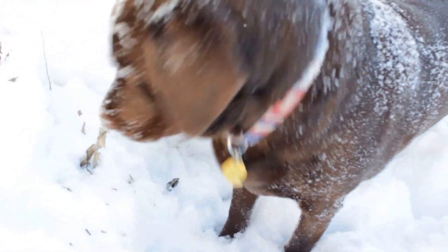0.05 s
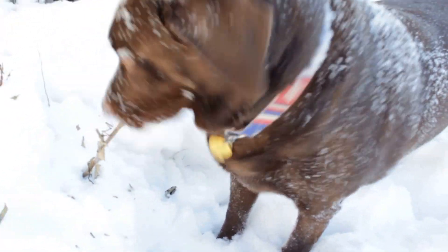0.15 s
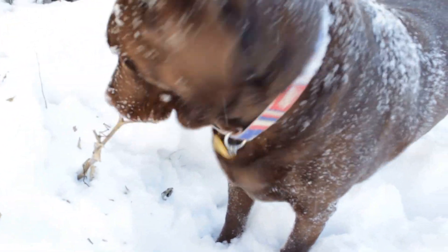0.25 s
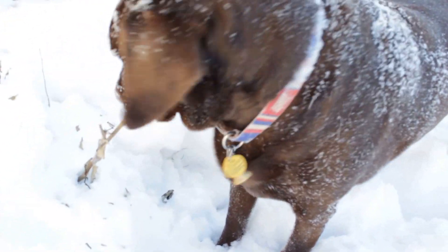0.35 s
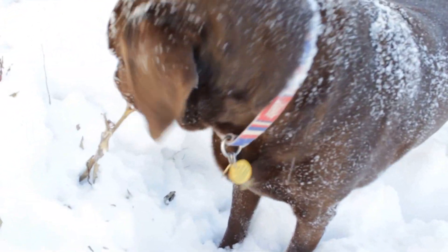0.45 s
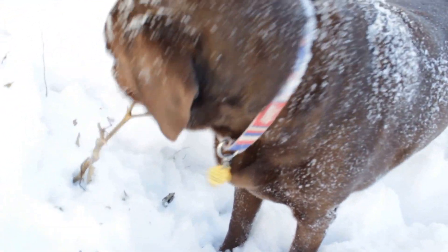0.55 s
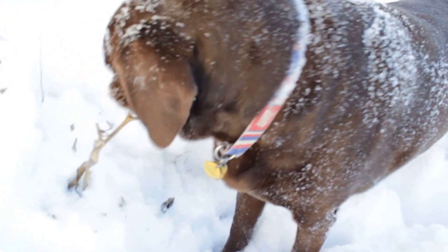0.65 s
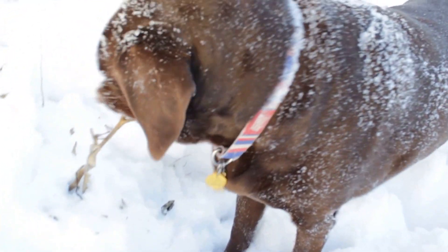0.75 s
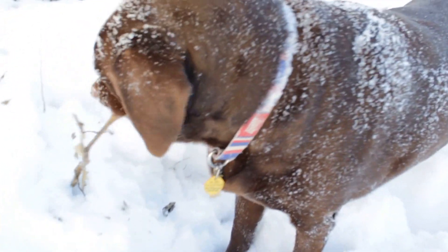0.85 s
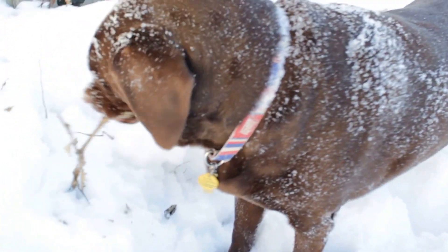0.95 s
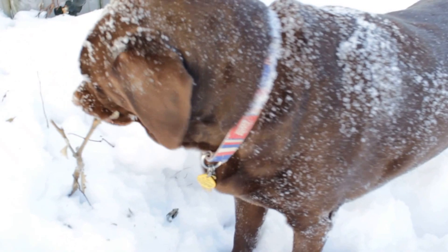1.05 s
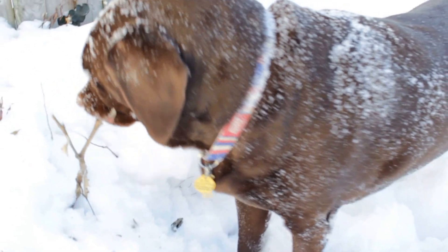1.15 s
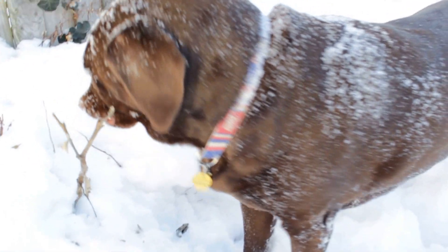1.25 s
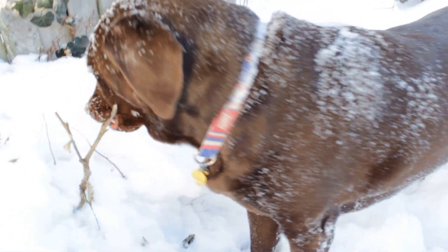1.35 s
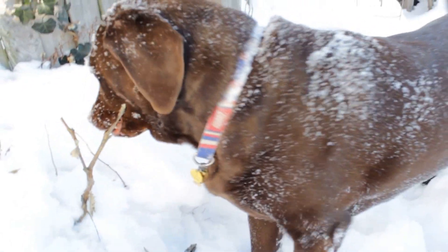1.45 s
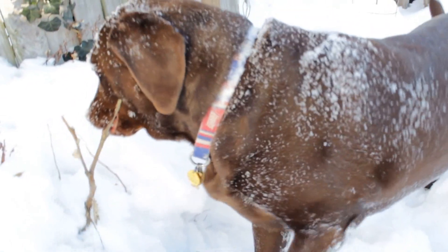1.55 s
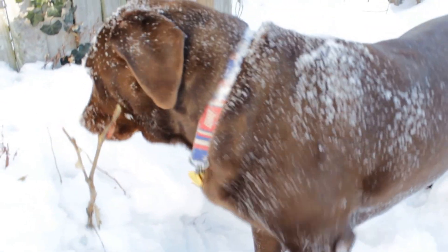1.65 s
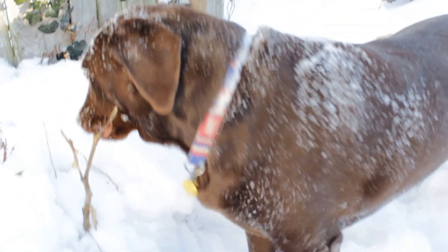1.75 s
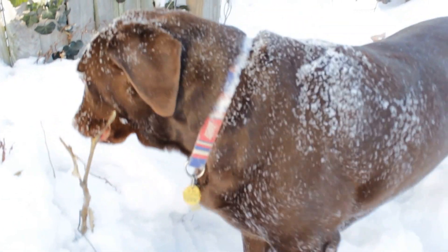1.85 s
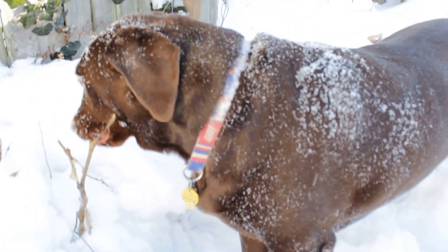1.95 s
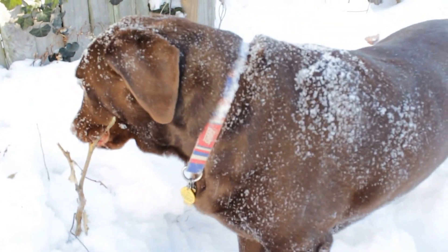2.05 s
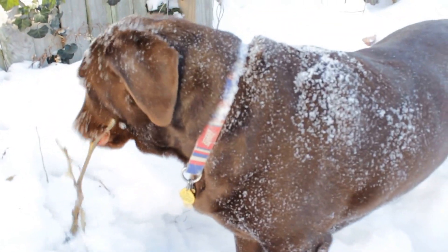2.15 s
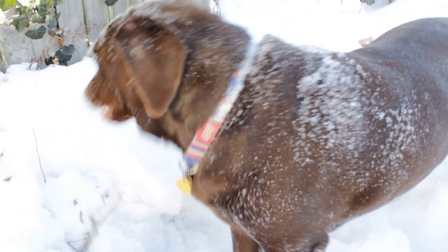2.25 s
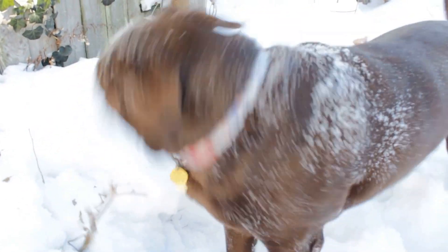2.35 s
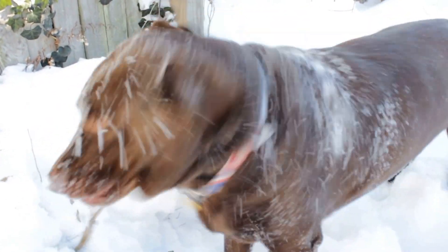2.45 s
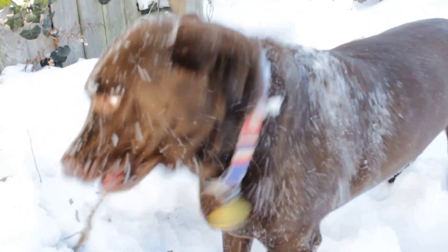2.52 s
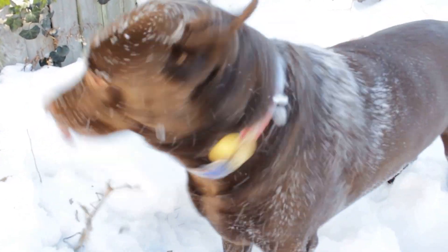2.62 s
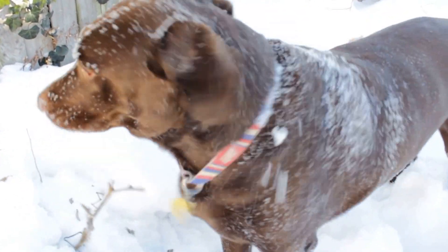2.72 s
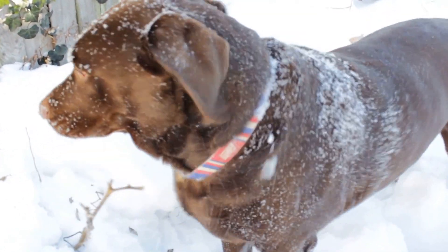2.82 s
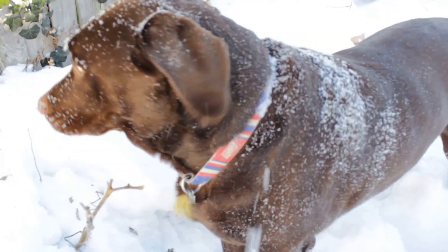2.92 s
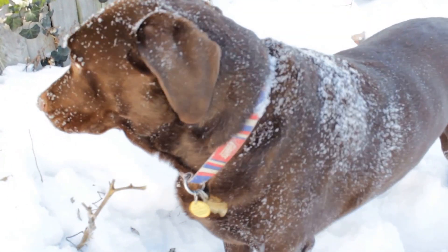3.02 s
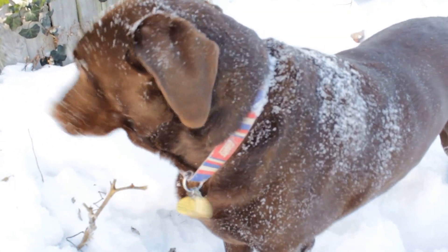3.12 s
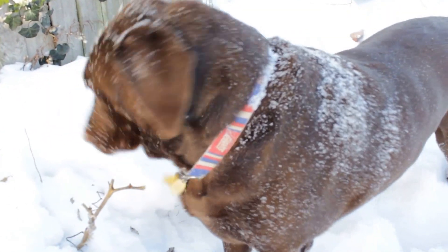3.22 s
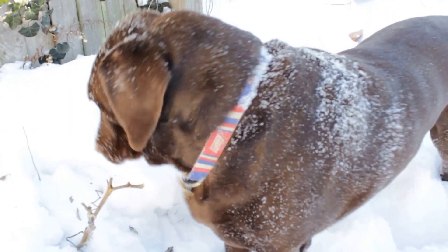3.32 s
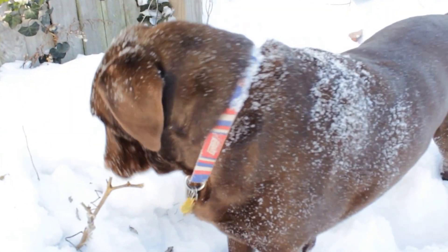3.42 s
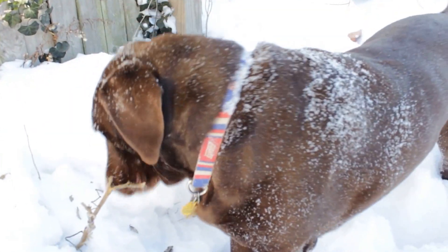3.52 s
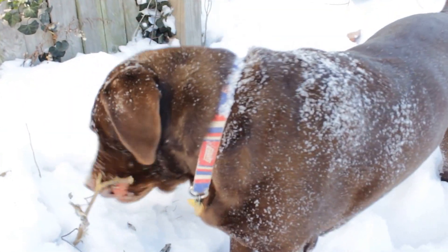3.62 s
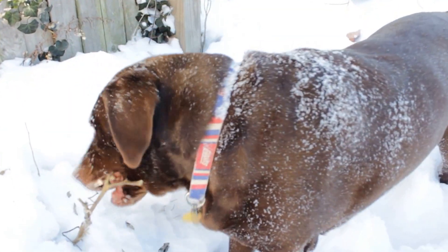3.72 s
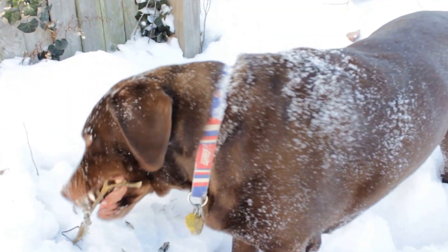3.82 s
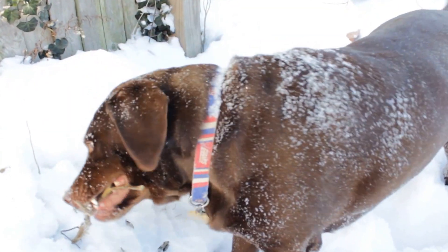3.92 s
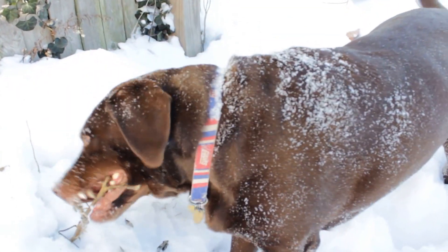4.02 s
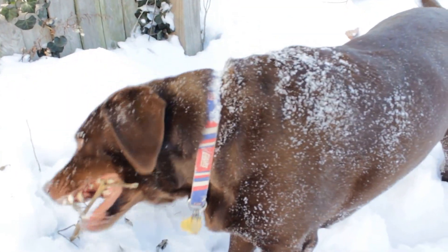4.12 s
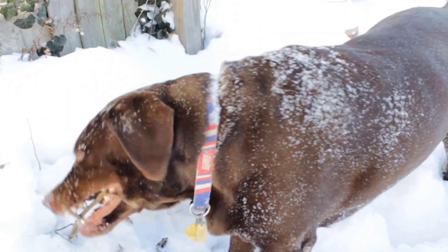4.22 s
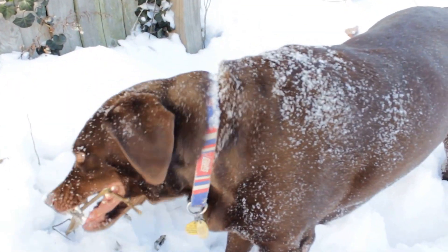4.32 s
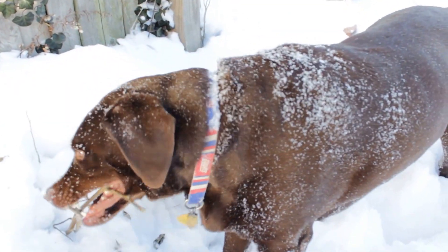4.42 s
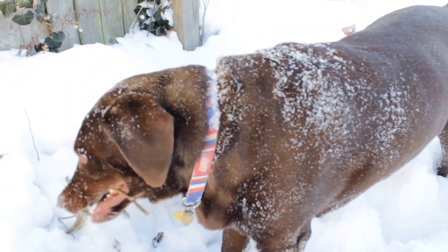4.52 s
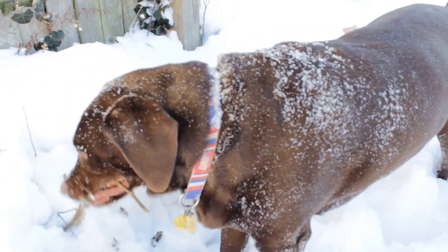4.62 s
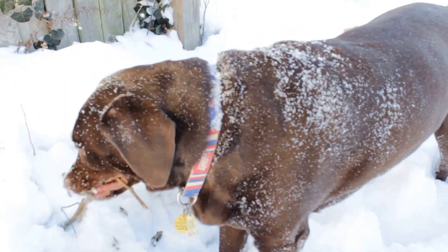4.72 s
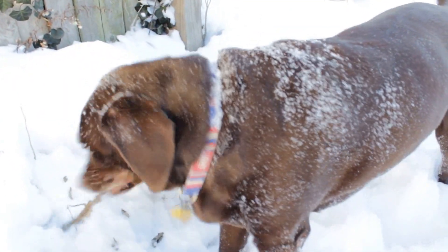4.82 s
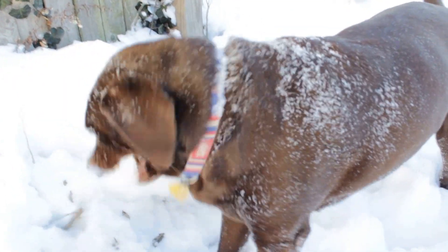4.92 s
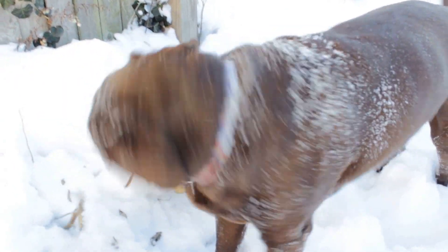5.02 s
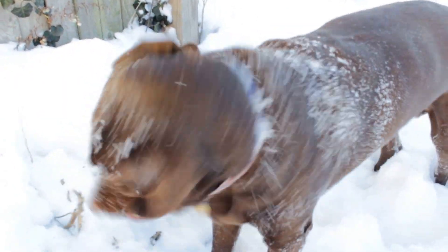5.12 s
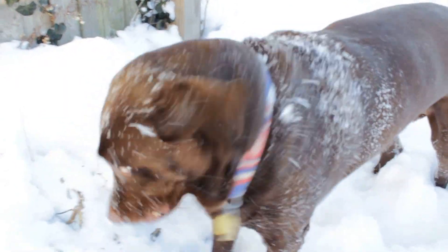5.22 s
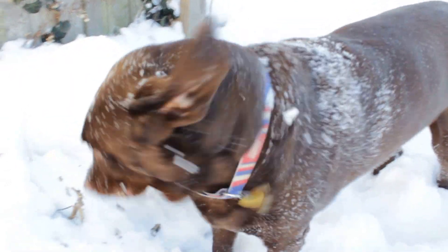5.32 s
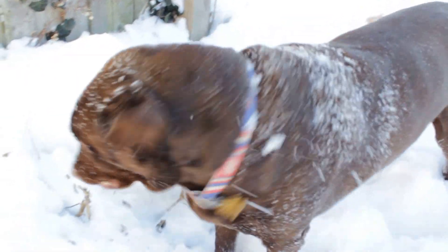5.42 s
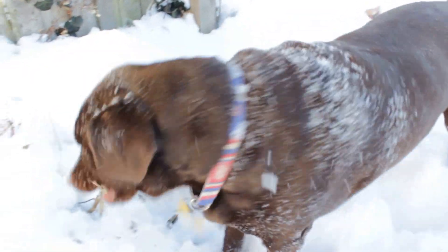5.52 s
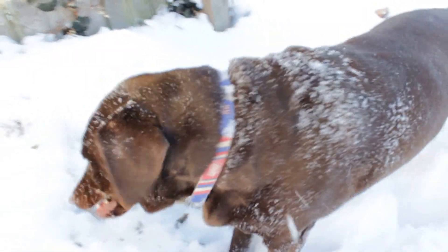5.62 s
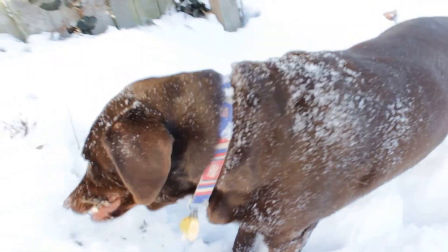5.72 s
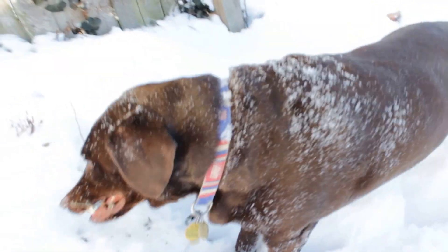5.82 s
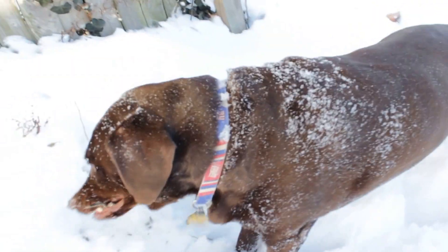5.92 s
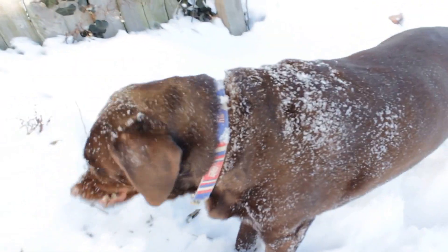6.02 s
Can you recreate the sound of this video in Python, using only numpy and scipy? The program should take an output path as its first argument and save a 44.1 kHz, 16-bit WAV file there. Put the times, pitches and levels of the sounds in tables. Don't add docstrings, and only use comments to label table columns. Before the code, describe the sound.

Thin metal tags tick and tinkle on a dog's collar over preamp hiss and distant rumble. Breathy nose huffs come, then a cluster of woody cracks as a twig is pulled, then a dense metallic shake. Loud crunches peak late while low wind buffets the small microphone and the hiss dips briefly. A softer tag flurry and a long huff end it. Very close, dry, outdoors in snow.

```python
import sys
import numpy as np
from scipy import signal
from scipy.fft import rfft, irfft, next_fast_len
from scipy.io import wavfile
from scipy.ndimage import uniform_filter1d

SR = 44100
rng = np.random.default_rng(int(sys.argv[2]) if len(sys.argv) > 2 else 0)


def gain_from_decibels(decibels):
    exponent = np.asarray(decibels, float) / 20
    return 10 ** exponent


def generate_wav(signal):
    frames = np.transpose(np.atleast_2d(signal))
    scaled = np.clip(frames, -1, 1) * 32767
    pcm = np.round(scaled).astype(np.int16)
    wavfile.write(sys.argv[1], SR, pcm)


N = 267230

# freq_hz, density_db [dB per Hz]
HISS_COLOUR = [(1500, -46), (4000, -3), (8000, -2), (13500, 0.5), (15500, -0.5), (16200, -25)]
RUMBLE_COLOUR = [(15, -39), (30, -2.5), (65, -1), (120, -8), (220, -3.5), (400, -8), (650, -19),
                 (1500, -29)]
BREATH_COLOUR = [(300, -9.5), (600, 1.5), (1200, -0.5), (2200, -5), (3100, -3.5), (4500, -13),
                 (7000, -14.5), (11000, -39)]
# start_s (the middle), half_length_s, level_db (over the air)
HUFFS = [
    (1.15, 0.17, 3.5),
    (1.377, 0.14, 4.5),
    (2.526, 0.083, 3),
    (3.376, 0.051, 2),
    (4.095, 0.15, 0),
    (5.39, 0.24, 3.5),
    (5.996, 0.38, 2.5),
]
# start_s, depth_db
DUCKS = [
    (1.6, 2),
    (4.4, 8),
    (4.66, 2),
    (4.85, 11),
]
# start_s, peak_db,
# pitch_hz, t60_s
TINKLES = [(0.2617, -43, 11940, 0.15), (0.2783, -47, 6010, 0.056), (0.3446, -51, 10570, 0.09),
           (0.3457, -46, 12150, 0.047), (0.5087, -42, 5980, 0.046), (0.5087, -44, 11950, 0.049),
           (0.6705, -47, 13300, 0.04), (2.5101, -35, 10680, 0.037), (2.5261, -38, 10520, 0.03),
           (2.6753, -21, 14310, 0.057), (2.7183, -42, 10600, 0.061), (2.8212, -33, 7220, 0.025),
           (2.8436, -41, 6320, 0.047), (2.8599, -37, 10660, 0.037), (2.8759, -39, 14300, 0.066),
           (3.012, -27, 6030, 0.059), (5.766, -39.5, 940, 0.13), (3.1804, -41, 12110, 0.045),
           (3.1934, -43, 10770, 0.15), (3.243, -49, 7330, 0.04), (3.3218, -44, 12020, 0.088),
           (3.4918, -42, 7340, 0.046), (3.8696, -35, 13100, 0.053), (3.9348, -44, 11930, 0.061),
           (4.087, -40, 5490, 0.035), (4.246, -44, 12070, 0.044), (4.3113, -16, 7150, 0.011),
           (4.3486, -43, 6190, 0.034), (2.437, -36.5, 3050, 0.095), (5.413, -45, 10660, 0.065),
           (5.4382, -31, 12000, 0.041), (5.5003, -47, 7260, 0.035), (5.5747, -40, 12120, 0.11),
           (5.638, -42, 5490, 0.035), (5.669, -31.5, 6040, 0.075), (5.6852, -39, 7330, 0.065),
           (5.6853, -31, 13210, 0.083), (5.7846, -36, 10530, 0.044), (5.9194, -45, 11920, 0.045)]
# start_s, peak_db, centre_hz
CHIPS = [(0.2667, -35, 8400), (0.3308, -33, 12700), (0.3455, -37, 12800), (0.3837, -32, 12000),
         (0.51, -33, 9100), (0.5571, -34, 9870), (0.5938, -31, 11300), (0.5983, -37, 9900),
         (0.6036, -26, 10700), (0.6101, -30, 7500), (0.988, -36, 10100), (0.9926, -27.5, 10700),
         (1.3417, -31, 8200), (1.5208, -33, 10200), (1.5245, -34, 10900), (1.6185, -32, 10600),
         (1.6515, -40, 11400), (1.6601, -30.5, 12900), (1.8457, -35, 7600), (1.8582, -33, 12000),
         (1.8965, -28.5, 10200), (2.1872, -27, 8600), (2.232, -23, 10600), (2.2727, -26, 12200),
         (2.4498, -35, 11900), (2.4866, -35, 10700), (2.5022, -11.5, 13460), (2.6373, -33, 11600),
         (2.6461, -28, 13700), (2.7158, -23, 13000), (2.7406, -38, 10200), (2.7518, -32, 12900),
         (2.762, -35, 9600), (2.8035, -30, 12200), (2.8337, -26, 12300), (2.8483, -23, 12900),
         (2.8565, -26, 12700), (2.9168, -31, 10700), (3.0551, -34, 7900),
         (3.1946, -34, 11800), (3.2097, -23, 14200), (3.2425, -23, 13000), (3.2491, -34, 12500),
              (3.4538, -29, 11900), (3.5333, -24.5, 12400), (3.688, -28.5, 8700), (3.7276, -42, 7600),
              (3.8663, -31, 10300), (3.878, -38, 12100), (3.9355, -40, 10400), (3.9864, -36, 10800),
              (4.1918, -36, 8600), (4.2064, -24, 12400), (4.2388, -35, 10000), (4.247, -38, 11300),
              (4.2769, -32, 11600), (4.2892, -30, 12600), (4.3028, -38, 11900), (4.3258, -33, 11800),
              (4.3354, -36, 11100), (4.3503, -29, 10600), (4.3693, -33, 11200), (4.3931, -24, 11900),
              (4.4014, -38, 11300), (4.4227, -30, 11700), (4.5679, -31, 10900),
         (4.6346, -36, 11300), (4.7915, -39, 12100), (4.7978, -22, 10200), (4.8392, -31, 7000),
              (4.8473, -25, 8850), (4.8318, -31, 6500), (4.8599, -29, 9400), (4.871, -5, 9550),
              (4.8934, -37, 9500), (4.9201, -39, 9400), (4.9307, -41, 8700), (5.2916, -37, 9350),
              (5.3176, -28, 13900), (5.3222, -39, 13900), (5.5775, -27, 12600), (5.4132, -33, 9100),
              (5.4492, -28, 12800), (5.5368, -33, 12100), (5.5445, -29, 11000), (5.5942, -26, 11500),
              (5.6372, -29, 8200), (5.6556, -27, 11900), (5.6597, -32, 12400), (5.664, -31, 12300),
              (5.696, -30, 12500), (5.7848, -31, 11800), (5.7982, -38, 8200), (5.8368, -25.5, 11200),
              (5.4985, -31.5, 10500), (5.8997, -28, 8700)]
TAG_MODE_HZ = [11925, 12180, 10540, 10140, 6020, 13230, 7250, 10850, 5500, 3030, 14290, 14375]
# level_db, t60_s
TAG_MODE_RING = [(-0.2, 0.058), (-1.5, 0.053), (1.5, 0.053), (-4.5, 0.048), (-12, 0.063), (0.5, 0.065),
                 (-9, 0.054), (-6, 0.076), (-19, 0.076), (-22, 0.044), (7, 0.053), (3, 0.041)]
TAG_MODE_GROUP = [0, 0, 1, 1, 1, 2, 2, 3, 3, 3, 3, 3]
# start_s, face_db, rim_db (over face), small_tag_db (over face), ring_length (factor)
NODS = [(.2761, -45.5, -3, -7, 2.1), (.296, -38, -17, -12, .7), (.329, -57, 2, 17, 0.8),
        (.3985, -37.5, 3, 1, 0.54), (.5245, -36, -9, -22, 0.46), (.5675, -48, -7, 11.5, 3),
        (1.7583, -44.5, -7, 4, 0.55), (2.055, -49, -8, 12, .8), (3.0775, -41, -7, -7, 0.67),
        (3.201, -34, -7, -9, .9), (3.21, -50.5, 22, -3, 1), (3.242, -39.5, 5.5, -16, 0.92),
        (3.3617, -48, 12, -6, 0.5), (3.39, -36.5, -1, -16, 0.44), (3.4918, -22, -5, -24, 0.68),
        (3.5314, -54, -7, 16.5, 0.53), (3.8692, -41.5, -3, 3, 0.66)]
SHAKE = [(2.398, -36, 1, 1, .9), (2.4086, -26, -19, -15, 0.87), (2.4152, -36, 2, -13, 1.2),
         (2.438, -36, -1, 8, 1.7), (2.454, -31, 3, -30, 0.69), (2.4714, -42, -4, 0, 1),
         (2.489, -40, 6, 5, 1.2), (2.498, -32.5, 10, -1, 0.92), (2.5022, -30, -3, -25, 0.49),
         (2.6447, -43, 9, -2, .45), (2.6523, -26, 2, 0, .55), (2.66, -5, -25, -18, 0.83),
         (2.674, -59, 28, -1, 0.59), (2.7153, -29.5, -7, -16, 0.84), (2.786, -31, -13, -8, 0.6),
         (2.803, -33, -9, 2, 1.3), (2.82, -37, 3, 8, 0.75), (2.8286, -33.5, -2, 0, 0.8),
         (2.843, -42, 11, 8, 0.65), (2.8554, -42, 8, -4, 0.68), (2.873, -49, 5, -13, 1.4),
         (2.911, -45.5, 0, -6, 0.92), (2.9707, -25.5, -13, -20, 0.7), (3.011, -18, -1.5, -8, 0.89)]
TOSS = [(5.1512, -62, 12, -1, 0.71), (5.242, -54, -1, 10, 0.68), (5.317, -47.5, 13, -5, 0.76),
        (5.4374, -40, 1, 8, 1.2), (5.4537, -31, -18, -6, 2.5), (5.4665, -35, 2, -14, 1.1),
        (5.504, -30.5, -14, -14, 0.47), (5.5352, -55, -2, 7, 1.8), (5.5562, -22, -13, -24, 0.4),
        (5.575, -46, 5, 3, 1.1), (5.634, -32.5, -10, -20, 2.6), (5.6531, -34, -9, -25, 1.8),
        (5.6695, -28.5, -3.5, -6, 1.9), (5.6808, -35, -11, -13, 1.4), (5.7829, -38.5, -8, 1, 0.62),
        (5.9193, -48, 9, -5, 0.48)]
FUR_LANDINGS = [.304, .408, .586, 2.466, 2.513, 2.683, 2.792, 3.022, 3.218, 3.256, 3.508, 5.479, 5.512,
                5.562, 5.584, 5.701, 5.792]
# start_s, body_db, brightness_db, pitch_hz
RING_TICKS = [(0.399, -34, -9, 3000), (0.406, -33, -11, 3400), (0.4222, -28.5, -2.5, 3260),
              (2.472, -28, -4, 3020), (2.4993, -31, -5, 2900), (2.6252, -26, -23, 3300),
              (2.6414, -25, -22, 2000), (2.653, -21.5, -22, 2700), (2.66, -9.5, -12, 2920),
              (2.8025, -30, -9, 3370), (2.8207, -33, 6, 3060), (2.829, -29, -2, 2650),
              (2.856, -25.5, -1, 3150), (2.9908, -28.5, -4, 3670), (3.0104, -14.5, 2, 3230),
              (3.054, -27, -16, 3400), (3.0777, -26.5, -16, 3350), (3.1825, -33, -18, 3340),
              (3.1978, -32, -12, 3500), (3.314, -33, -7, 3240), (3.4924, -27.5, -11, 2620),
              (3.934, -33.5, -30, 2860), (5.4281, -24, -6, 2960), (5.4377, -25.5, 3.5, 3100),
              (5.4515, -26, 3.5, 3460), (5.548, -36, 6, 3480), (5.593, -31.5, -12, 2880),
              (5.632, -28.5, -2, 3400), (5.7838, -31.5, 7, 3240), (5.8988, -19, -17, 3740)]
# start_s, wood_db, brightness_db, pitch_hz
TUG_CRACKS = [(0.5658, -25, -3, 3210), (0.7147, -42, 7, 3400), (0.9269, -34, 7, 3540),
              (1.6224, -21, 16, 3600), (2.1918, -25, -10, 4300), (2.196, -21, -6, 4000),
              (2.199, -25, -16, 4000), (2.2067, -21.5, 0, 4400), (2.2095, -18, -22, 3800),
              (2.215, -22.5, -4, 4030), (2.226, -29, 0, 1860), (2.2352, -22.5, 2, 1750),
              (2.2392, -15.5, -16, 1742), (2.2442, -20, 4.5, 5090), (2.2477, -18, 0, 4000),
              (2.257, -29, -10, 5080), (2.288, -40, 5, 4360)]
CHEW_CRACKS = [(3.9672, -52, 9, 2870), (4.21, -30.5, -3, 3290), (4.2609, -20.5, 4, 4830),
               (4.266, -22.5, 3, 4680), (4.2837, -38, 8, 4240), (4.3064, -16.5, -2, 3430),
               (4.3118, -16, 0, 4430), (4.357, -37, 3, 4160), (4.3674, -39, 8, 4400),
               (4.375, -20.5, 3, 4700), (4.381, -34, -1, 4330), (4.3917, -42, 9, 4750),
               (4.405, -27, 4, 4000), (4.41, -9.5, -1, 4180), (4.4259, -18, 3, 3440),
               (4.5315, -37, 1, 3780), (4.6307, -37.5, -5, 1750), (4.6668, -18.5, 0.5, 3600),
               (4.778, -39.5, -1, 5100), (4.7964, -24.5, -2, 3970), (4.811, -39, 5, 1930),
               (4.8182, -4.5, -6, 4030), (4.8642, -3.5, -3, 3420), (4.871, -22, -20, 1756),
               (4.8821, -12, -2, 1900), (4.928, -37, -5, 3500), (4.962, -36.5, -22, 2000),
               (5.099, -38, 0.5, 1785)]
# start_s, level_db, jaw_pitch_hz
BITES = [(0.57, -28, 1450), (1.624, -21.5, 864), (2.196, -22, 1656), (2.224, -29, 1622), (2.238, -14, 1387),
         (2.38, -35, 1250), (2.516, -32.5, 665), (2.565, -30, 845), (2.63, -31, 1320), (2.634, -24.5, 920),
         (2.626, -26.5, 1630), (2.832, -29.5, 1430), (3.01, -26, 1550), (3.727, -22, 866), (4.05, -37, 945),
         (4.1605, -16, 1045), (4.311, -27.5, 890), (4.41, -28, 1040), (4.426, -33, 546), (4.566, -45, 541),
         (4.818, -20, 1520), (4.82, -23.5, 990), (4.868, -23, 1030), (5.076, -45, 1450), (2.2, -27.5, 774),
         (4.865, -16, 1003), (5.017, -41, 1330), (5.141, -36.5, 1020), (5.429, -34.5, 1400),
         (5.669, -29.5, 570), (5.776, -37, 930)]
# low_hz, high_hz, burst_t60_s, level_db, ring_share (factor), ring_t60_s
CRACK_PARTS = [
    (696, 1880, 0.027, 4, 1.04, 0.02),
    (1750, 5140, 0.0013, 4, 0.77, 0.011),
    (4960, 8250, 0.0035, 4.5, 0.2, 0.0043),
    (8700, 16300, 0.0032, 7.5, 0.66, 0.0029),
]
# start_s, peak_db, pitch_hz
PUFFS = [(4.3973, -30, 67), (4.459, -40, 84), (4.4679, -31.5, 209), (4.4988, -23.5, 155), (4.566, -31, 97),
         (4.6168, -26.5, 97), (4.632, -32, 142), (4.665, -27, 77.8), (4.6903, -25.5, 122),
         (4.7135, -23.5, 135), (4.7316, -18.5, 127), (4.7492, -29, 142), (4.783, -30, 125),
         (4.801, -17, 105), (4.829, -20, 157), (4.844, -27.5, 103), (5.144, -33.5, 91),
         (2.2421, -22.5, 310), (4.868, -23, 298), (4.885, -29, 330), (4.821, -32, 350), (4.565, -29.5, 410)]


def unit(x):
    return x / np.sqrt(np.mean(x ** 2) + 1e-20)


def filtered(x, response):
    m = next_fast_len(N + 8192)
    return irfft(rfft(x, m) * response(np.fft.rfftfreq(m, 1 / SR)), m)[:N]


def rush(colour, patchy_db):
    z = signal.stft(rng.standard_normal(N), nperseg=512)[2]
    patches = uniform_filter1d(rng.standard_normal(z.shape), size=10, axis=1)
    patches = unit(uniform_filter1d(patches, size=6, axis=0))
    x = signal.istft(z * gain_from_decibels(patchy_db * patches), nperseg=512)[1][:N]
    f, db = np.transpose(colour)
    return unit(filtered(x, lambda hz: gain_from_decibels(np.interp(np.log(hz + 1), np.log(f), db, -90, -90))))


def wobble(shape, rate, length):
    knots = rng.standard_normal((*shape, int(length * rate / SR) + 2))
    at = np.arange(length) * rate / SR
    i, blend = at.astype(int), at % 1
    return knots[..., i] * (1 - blend) + knots[..., i + 1] * blend


def add(track, s, sound):
    track[round(s * SR):][:len(sound)] += sound


def bed_levels():
    t = np.arange(N) / SR
    duck_db, huff_db = np.zeros((2, N))
    for s, depth_db in DUCKS:
        u = np.maximum(t - s, 0) / 0.11
        duck_db += depth_db * u * np.exp(1 - u)
    for s, half_s, db in HUFFS:
        huff_db += db * np.exp(-((t - s) / half_s) ** 2)
    hiss_db = -58 + 0.12 * huff_db - 0.79 * duck_db
    rumble_db = -46.5 + 0.12 * wobble((), 2.3, N) - duck_db
    air_db = -51.5 + huff_db - duck_db
    return hiss_db, rumble_db, air_db


def yard():
    hiss_db, rumble_db, breath_db = bed_levels()
    hiss = gain_from_decibels(hiss_db + 6.0) * rush(HISS_COLOUR, patchy_db=-0.4)
    rumble = gain_from_decibels(rumble_db + 1.0) * rush(RUMBLE_COLOUR, patchy_db=1.5)
    breath = gain_from_decibels(breath_db + 2.0) * rush(BREATH_COLOUR, patchy_db=2.0)
    jet = rush([(2500, -20), (3500, -1.5), (5500, -1), (9000, -16)], patchy_db=0.5)
    return hiss + rumble + breath + gain_from_decibels(2 * (breath_db + 46) - 48.5) * jet


def tinkles():
    out, t = np.zeros(N + SR), np.arange(SR // 9) / SR
    rise = 1 - np.exp(-t / 0.00055)
    for s, db, hz, t60 in TINKLES:
        level_db = db + 2.0 - 60 * t / max(t60, .01) + 2.5 * wobble((), 300, len(t))
        add(out, s, gain_from_decibels(level_db) * np.sin(2 * np.pi * hz * t) * rise)
    return out[:N]


def chips():
    out, t = np.zeros(N + SR), np.arange(SR // 80) / SR
    rise = 1 - np.exp(-t / 0.000081)
    for s, db, centre_hz in CHIPS:
        spread, phase = rng.standard_normal((2, 10, 1))
        hz = np.clip(1.1 * centre_hz * np.exp(0.256 * spread), 2500, 15600)
        t60 = 0.0052 * 10000 / hz
        partials = gain_from_decibels(-60 * t / t60) * np.sin(2 * np.pi * hz * t + 2 * phase)
        tick = partials.sum(0) * rise
        add(out, s, gain_from_decibels(db) * tick / np.abs(tick).max())
    return out[:N]


def contacts():
    s, face_db, rim_db, small_db, length = np.transpose(sorted(NODS + SHAKE + TOSS))
    bend_db = face_db + rim_db / 2 - 2.5 + 0.5 * np.log2(np.maximum(length, .1))
    return np.transpose([s, face_db, bend_db, face_db + small_db, face_db + rim_db, length])


def tags():
    out, chatter, rattle = np.zeros((3, N + SR))
    t = np.arange(SR // 9) / SR
    rise = 1 - np.exp(-(t / 0.00088) ** 2)
    hz, (db, t60) = np.c_[TAG_MODE_HZ], np.transpose(TAG_MODE_RING)[..., None]
    rows = contacts()
    gaps = np.diff(rows[:, 0], append=N / SR)
    for (s, *levels_db, ring_length), gap in zip(rows, gaps):
        length = max(ring_length, .15)
        detune, scatter, phase = rng.standard_normal((3, len(hz), 1))
        strength_db = np.take(levels_db, TAG_MODE_GROUP)[:, None] + db + 2 * scatter - .6
        fading_db = 60 * t / (t60 * length)
        fading_db = fading_db + 60 * np.maximum(t - gap, 0) / 0.1
        fur_s = min([f for f in FUR_LANDINGS if f > s] + [N / SR])
        fading_db = fading_db + 3 * np.clip((s + t - fur_s) / .006, 0, 1)
        decay = gain_from_decibels(-fading_db) + gain_from_decibels(-18 - fading_db / 2.4)
        flicker_db = 3.1 * wobble((len(hz),), 334, len(t))
        tone = np.sin(2 * np.pi * hz * (1 + .0013 * detune) * t + 2 * phase)
        ring = gain_from_decibels(strength_db + flicker_db) * decay * tone
        add(out, s, ring.sum(0) * rise)
        add(chatter, s, gain_from_decibels(0.57 * np.median(levels_db) - 16.0 - 60 * t / 0.087))
        add(rattle, s, gain_from_decibels(max(levels_db) - 7.5 - 60 * t / (0.074 * length)))
    knocks = (rng.random(N) < 1100 / SR) * rng.standard_normal(N) * chatter[:N]
    wire = signal.lfilter(*signal.iirpeak(3250, 7.5, SR), knocks)
    grit = signal.lfilter(*signal.iirpeak(12500, 1.5, SR), knocks)
    scrape = rattle[:N] * rush([(3000, -20), (8000, -22.5), (10500, -11), (12000, -2.0),
                                (14500, -9), (15800, -8)], patchy_db=-7)
    return out[:N] + gain_from_decibels(21.0) * wire + gain_from_decibels(-12.0) * grit + scrape


def cracks():
    rows = []
    for s, db, bright, hz in TUG_CRACKS + CHEW_CRACKS:
        rows.append((s, db - 19.5, db, db + 0.33 * bright + 2, db + bright + 4, hz))
    for s, db, bright, hz in RING_TICKS:
        rows.append((s, db - 16.5, db, db + bright - 0.5, db + bright - 1.1, hz))
    for s, db, hz in BITES:
        rows.append((s, *(db - 1.5 - 7.5 * np.arange(4)), hz))
    return rows


def twig():
    out, t = np.zeros(N + SR), np.arange(SR // 25) / SR
    bands = [signal.butter(2, [lo, hi], "band", fs=SR) for lo, hi, *_ in CRACK_PARTS]
    rise = 1 - np.exp(-(t / 0.00019) ** 2)
    width = 1.372
    for s, *levels_db, body_hz in cracks():
        splinters = gain_from_decibels(-18.0 - 60 * t / 0.026 + 3.3 * wobble((), 920, len(t)))
        for level_db, band, part in zip(levels_db, bands, CRACK_PARTS):
            lo, hi, burst_t60, db, share, ring_t60 = part
            noise = rng.standard_normal(len(t))
            centre_hz = lo + (hi - lo) * (0.333 + 0.28 * rng.random())
            if lo <= body_hz < hi:
                centre_hz, share = body_hz, 1.09 * share
                band = signal.butter(2, [body_hz / width / width, body_hz * width], "band", fs=SR)
            burst = signal.lfilter(*band, noise * rise * (gain_from_decibels(-60 * t / burst_t60) + splinters))
            knock = rise * gain_from_decibels(-60 * t / ring_t60) * np.sin(2 * np.pi * centre_hz * t)
            sound = burst / np.abs(burst).max() + share * knock / np.abs(knock).max()
            add(out, s + .0009, gain_from_decibels(level_db + db - 3) * sound / np.abs(sound).max())
    return out[:N]


def gust():
    out, t = np.zeros(N + SR), np.arange(-SR // 25, SR // 25) / SR
    for s, db, hz in PUFFS:
        u = (2.95 * hz * t) ** 2
        add(out, s + t[0], gain_from_decibels(db) * (1 - 2 * u) * np.exp(-u))
    inside = np.digitize(np.arange(N) / SR, (4.42, 4.86)) == 1
    blowing = uniform_filter1d(1. * inside, size=SR // 30)
    level = gain_from_decibels(-43.5 + 3.1 * wobble((), 25, N))
    buffeting = rush([(30, -12), (110, -1.0), (260, -6.5), (600, -34)], patchy_db=1.0)
    return out[:N] + level * blowing * buffeting


def scene():
    return (yard() + tinkles() + chips() + tags() + twig() + gust())[None]


def band_limit(x):
    return signal.sosfilt(signal.butter(12, 16860, fs=SR, output="sos"), x)


def record(dry):
    x = dry[0] / (1 + np.abs(dry[0]) ** 8) ** (1 / 8)
    top_hz = 15800
    low = filtered(x, lambda hz: gain_from_decibels(np.clip((top_hz - hz) / 5, -40, 0)))
    high = x - low
    power = np.abs(uniform_filter1d(high ** 2, size=200))
    earlier = np.roll(np.abs(uniform_filter1d(power, size=1200)), 800)
    sudden = power > 12 * earlier + gain_from_decibels(-104)
    x = low + gain_from_decibels(-15) * high * uniform_filter1d(1. * sudden, size=200)
    return band_limit(np.clip(x, -1, 1)[None])


dry = scene()
out = record(dry)
generate_wav(out)
```